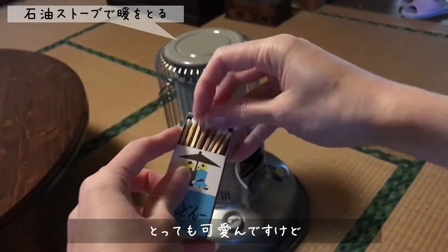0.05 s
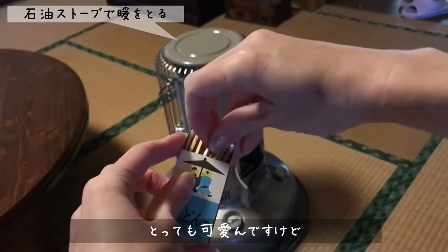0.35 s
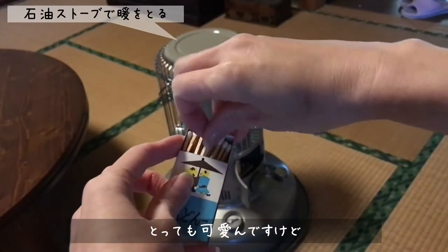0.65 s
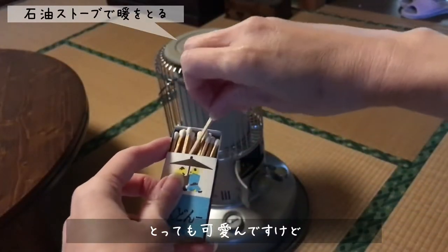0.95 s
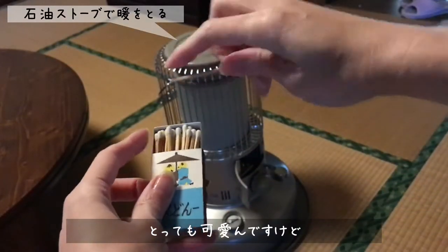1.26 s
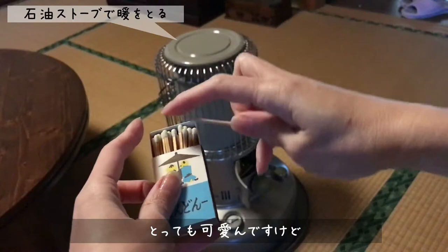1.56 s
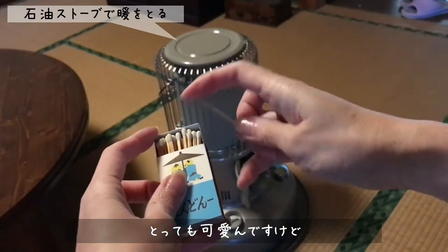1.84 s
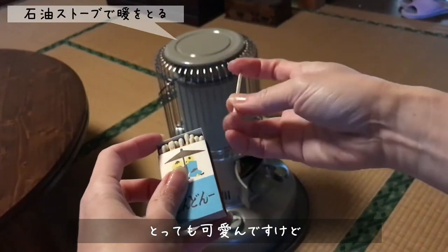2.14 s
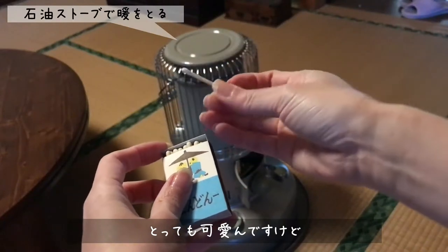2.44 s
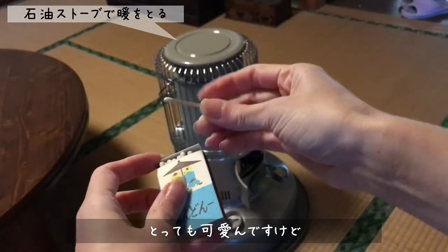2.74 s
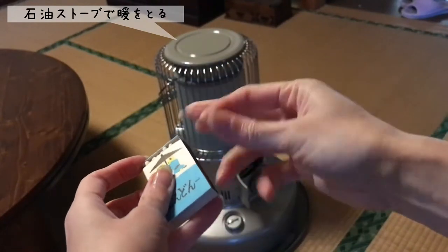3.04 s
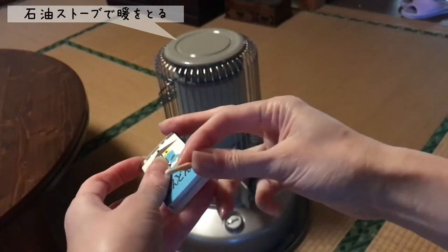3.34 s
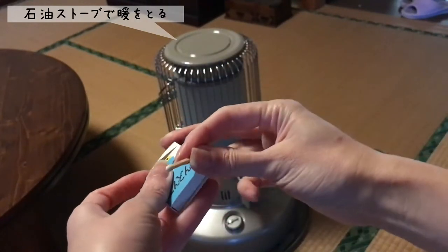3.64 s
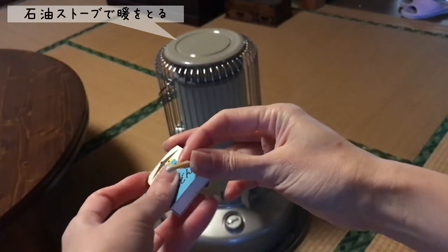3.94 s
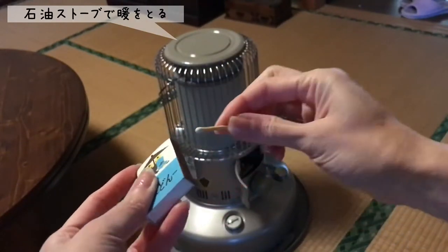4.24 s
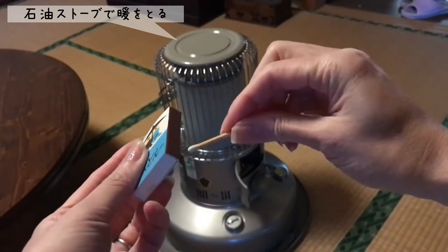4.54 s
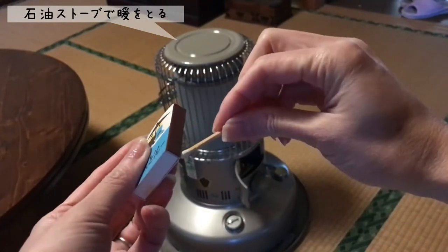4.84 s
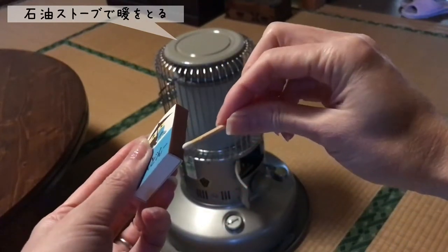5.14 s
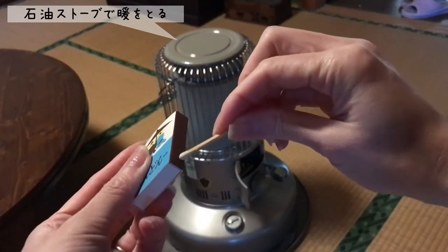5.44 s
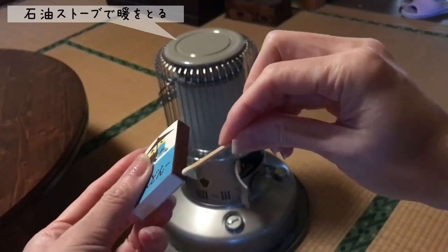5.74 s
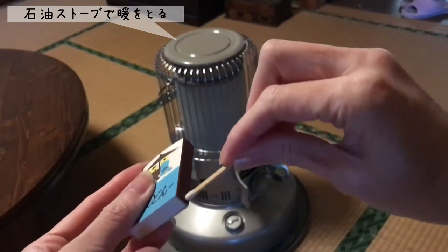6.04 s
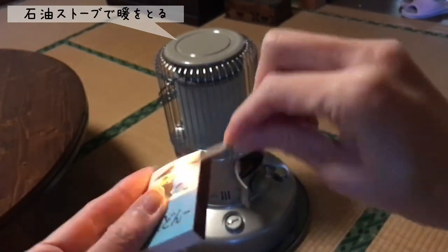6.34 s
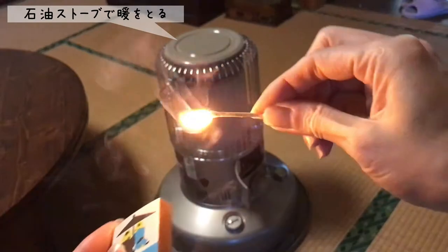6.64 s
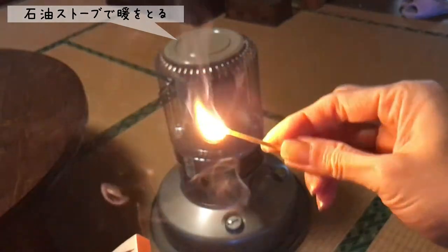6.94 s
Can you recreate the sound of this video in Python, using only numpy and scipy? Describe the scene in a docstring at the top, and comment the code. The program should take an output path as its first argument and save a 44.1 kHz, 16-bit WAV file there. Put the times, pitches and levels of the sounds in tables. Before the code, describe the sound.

Loose wooden sticks tick and slide in a small cardboard matchbox as one is picked out. Faint finger rubbing and scattered taps follow, then the papery slide of the tray closing and a few dull bumps. After a near pause, a quick rasp and a loud snap light the match, which hisses and settles into a fluttering flame. Everything is heard close up in a quiet, soft room with a faint low rumble.

```python
"""In a small, quiet room, close by, fingers pick a wooden match out of a cardboard box and strike it.
The sticks click and slide, one is drawn out and rolled between the fingertips, the tray is pushed shut
and the box is turned in the hand. Knocks ring the hollow box; rubbing is many tiny catches and slips.
Then the match head scrapes along the striker, catches with a crack, fizzes and flares."""
import sys
import numpy as np
from scipy import signal
from scipy.fft import rfft, irfft
from scipy.io import wavfile
from scipy.ndimage import uniform_filter1d

SR = 44100
rng = np.random.default_rng(int(sys.argv[2]) if len(sys.argv) > 2 else 0)


def digitize_waveform(pressure):
    """Quantize a signal to 16-bit integers and store it at the path in sys.argv[1].

    Rows of a 2-D input are taken as channels; values are limited to [-1, 1].
    """
    field = np.atleast_2d(pressure).T
    bounded = np.clip(field, -1, 1)
    quanta = np.round(bounded * 32767).astype(np.int16)
    wavfile.write(sys.argv[1], SR, quanta)


N = 312669
TIME = np.arange(N) / SR
MATCH_OUT_S, TRAY_SHUT_S, IGNITION_S = 1.3, 3.3, 6.3935
BOX_HZ, TOP_HZ = 2400, 16100  # the box's own pitch; where the treble is cut off


# the head bursting: (time [s], level [dB], bass lift [dB/octave], treble lift [dB/octave])
BURSTS = [(6.3907, 6.5, -2, 1), (6.3919, -9, 1, 0), (6.3924, -2.5, -8, 2.5), (6.3929, 1, 1, 1),
          (6.3932, 6, 5, -1)]
# the tone of a burst: (frequency [Hz], level [dB])
BURST_TONE = [(150, -32.5), (450, -18.5), (800, -11), (1400, -9), (2400, -2.5), (2950, -12.5), (3800, -1),
              (4400, 7), (5100, 4.5), (6200, -9.5), (7800, -9), (9200, 2.5), (10300, -9), (11500, 4),
              (15200, 0.5), (16500, 1)]

def ignition(puff_db=-4, sputter_db=-21, sputter_fade_s=0.016):
    """The match head bursts in a tight cluster of cracks, puffs out hot gas and sputters."""
    out = np.zeros(N)
    for s, db, bass, treble in BURSTS:
        add(out, s, undb(db) * response(BURST_TONE, bass, treble))
    puff = thump(start_hz=1300, end_hz=153, glide_s=.00222, fade_s=.0138)
    add(out, BURSTS[1][0], undb(puff_db) * puff)
    t = TIME[:SR // 2]
    sputter = undb(sputter_db) * fade(t, sputter_fade_s) * grit(len(t), per_s=7800, spread_db=6.5)
    add(out, BURSTS[0][0], through(sputter, response(BURST_TONE, bass=3.9, treble=-5.5)))
    return out


def thump(start_hz, end_hz, glide_s, fade_s):
    """A short thump that falls in pitch as it fades."""
    t = TIME[:SR // 30]
    hz = end_hz + (start_hz - end_hz) * np.exp(-(t / glide_s) ** 2)
    wave = np.sin(2 * np.pi * np.cumsum(hz) / SR) * fade(t, fade_s)
    return unit_energy(np.diff(wave, prepend=0) / hz)


def microphone_ring(lag_s=0.0024, level_db=-25):
    """A low thump, falling in pitch, rings on in the microphone after the crack."""
    out = np.zeros(N)
    ring = thump(start_hz=150, end_hz=48, glide_s=0.004, fade_s=0.086)
    add(out, IGNITION_S + lag_s, undb(level_db) * ring)
    return out


# the tone of the gas jet: (frequency [Hz], level [dB])
JET_TONE = [(100, -9), (300, -19), (1300, 5.5), (2500, 5), (4400, 1.5), (7000, 0), (7900, -3), (9600, 5),
            (10500, -3), (12200, 1), (16000, -3)]

def fizz(level_db=-33, fade_s=0.22):
    """A jet of gas hisses out of the head and dies away."""
    out = np.zeros(N)
    t = TIME[:SR // 2]
    jet = undb(level_db) * fade(t, fade_s) * grit(len(t), per_s=8200, spread_db=4)
    add(out, IGNITION_S, through(jet, response(JET_TONE)))
    return out


# how the flame rises and falls: (time [s], relative level [dB])
FLAME_LEVELS = [(6.52, -51.5), (6.544, -57.5), (6.596, -49.5), (6.61, -55), (6.704, -49), (6.73, -54),
                (6.752, -49.5), (6.936, -52.5), (6.962, -49), (7.048, -52), (7.09, -48)]
# the tone of the flame: (frequency [Hz], level [dB])
FLAME_TONE = [(60, -8), (220, 3.5), (430, -1.5), (1500, 1), (1950, -4.5), (2900, 0.5), (3450, -5.5),
              (4100, -2), (4700, -8.5), (5350, -3.5), (7900, -9.5), (9200, -8.5), (10500, -14),
              (12700, -10.5), (16000, -16)]

def flame(flutter_db=1.57, alight_at_s=6.64, changeover_s=0.014):
    """The flame rushes, dull at first, then seething brightly once the whole head is alight."""
    times, levels = np.transpose(FLAME_LEVELS)
    heat = undb(np.interp(TIME, times, levels) + flutter_db * wander(per_s=220)) * (TIME > IGNITION_S)
    alight = .5 + .5 * np.tanh((TIME - alight_at_s) / changeover_s)
    dull = response(FLAME_TONE, bass=0.91, treble=-1.9)
    bright = response(FLAME_TONE, rings=[(5300, .1, 3.5), (3470, .15, -4.5)])
    rush = undb(-1.3) * through(grit(N, per_s=9000, spread_db=1), dull)
    seethe = undb(-0.5) * through(grit(N, per_s=5000, spread_db=3), bright)
    return heat * (np.sqrt(1 - alight) * rush + np.sqrt(alight) * seethe)


# the head biting, dragging and leaving the striker: (start [s], rise [s], fall [s], level [dB],
# bass lift [dB/octave], treble lift [dB/octave], ring [Hz])
STRIKE = [(6.346, 0.0011, 0.018, -34, -3.5, -5.5, 1800), (6.358, 0.024, 0.008, -32, 1, 0.5, 3679),
          (6.425, 0.0042, 0.017, -35, -5, -1, 2150)]

def scrape():
    """The head rasps over the grains of the striker, which shake the box."""
    out = np.zeros(N)
    for rub in STRIKE:
        add(out, rub[0], slide(rub, per_s=16000, spread_db=3.5, rings=[(700, .79, -2.5)]))
    return out


# wood and card meeting: (time [s], relative level [dB], treble lift [dB/octave], ring [Hz])
TAPS = [(0.062, -31.5, 8, 6200), (0.133, -26, 1, 4200), (0.1375, -30, 0, 2400), (0.1773, -17.5, -0.5, 2300),
        (0.1966, -26.5, 2, 5300), (0.233, -32, 1, 2400), (0.265, -22, -4, 2730), (0.309, -36, 0, 6400),
        (0.3393, -33, 0, 3280), (0.343, -25.5, -11, 4020), (0.4293, -21.5, -0.5, 6900),
        (0.5655, -26.5, -3, 5370), (0.631, -16.5, 1, 2480), (0.756, -29, 2.5, 2800),
        (0.815, -26.5, 2, 5430), (0.8203, -31.5, -1, 2600), (0.941, -33.5, 0, 2800),
        (1.0104, -37, -2, 5300), (1.0552, -29, 3, 3300), (1.1263, -22.5, 6, 1990), (1.1414, -27, 8, 1670),
        (1.1898, -30, 6, 10700), (1.2227, -28, 6, 1700), (1.3313, -33.5, 8, 5200), (1.3398, -35, 6.5, 1680),
        (2.079, -32.5, 1, 13000), (2.377, -33, -1, 9200), (2.404, -19.5, -9, 1680),
        (2.5953, -29, -18, 1500), (2.7184, -22.5, 8, 9100), (2.7926, -42, 23, 11000),
        (2.9066, -42, 15, 13000), (3.7334, -24, 3.5, 12500), (3.8147, -35, -7, 1400),
        (4.0216, -27, 1, 1710), (5.4295, -30.5, -7, 1700), (5.5075, -35, -3.5, 9300),
        (5.6268, -28, 1.5, 1870), (5.7747, -43.5, 6, 6260), (6.349, -14.5, 9, 10700), (6.365, -17, 5, 2800)]

def clicks(gain_db=0.9, hard_above_db=-28):
    """Wood and card knock together: sharp taps add both bass and treble, hard ones have less bass."""
    out = np.zeros(N)
    for s, db, treble, ring_hz in TAPS:
        bass = 4 + 0.36 * treble - 0.6 * max(db - hard_above_db, 0)
        add(out, s, undb(db + gain_db) * click(s, treble, ring_hz, bass))
    return out


def click(s, treble, ring_hz, bass, chatter_db=-5, chatter_fade_s=0.022):
    """One tap rings the box, a stick and two of its neighbours, and chatters as it settles."""
    t = TIME[:SR // 30]
    chatter = fade(t, chatter_fade_s) * grit(len(t), per_s=2200, spread_db=6.5)
    force = (t == 0) + undb(chatter_db) * unit_energy(chatter)
    neighbours = [(hz, .06, 9.5) for hz in 4800 * 2 ** (0.68 * rng.standard_normal(2))]
    rings = [(ring_hz, .35, 7), (ring_hz, .07, 5), (14500, .3, -3), *neighbours]
    knock = signal.fftconvolve(force, box(s, bass, treble, rings))
    return smear(unit_energy(knock))


def smear(x, lag_s=0.000496):
    """Low notes travel more slowly through thin wood and card; lag_s is the delay at BOX_HZ."""
    size = len(x) + 1024
    f = np.fft.rfftfreq(size, 1 / SR)
    phase = 4 * np.pi * lag_s * np.sqrt(f * BOX_HZ)
    return irfft(rfft(x, size) * np.exp(-1j * phase), size)


# a stick, the tray or a finger rubbing along the box:
# (start [s], rise [s], fall [s], relative level [dB], treble lift [dB/octave], ring [Hz])
RUBS = [(0.121, 0.012, 0.025, -43.5, -1, 4170), (0.152, 0.014, 0.019, -43.5, -1, 1690),
        (0.192, 0.016, 0.04, -48.5, 1.5, 1670), (0.421, 0.012, 0.043, -48, -3, 1050),
        (0.605, 0.033, 0.017, -43.5, -0.5, 5440), (1.04, 0.013, 0.057, -62.5, 1, 4200),
        (1.112, 0.013, 0.031, -49.5, 0.5, 1710), (1.35, 0.11, 0.073, -64.5, 0, 11400),
        (2.323, 0.0054, 0.012, -52, 0.5, 4200), (2.363, 0.008, 0.012, -55.5, 1, 8900),
        (2.466, 0.008, 0.021, -53, 1.5, 1050), (2.585, 0.011, 0.12, -64.5, 2, 1400),
        (2.719, 0.0036, 0.061, -62, 5, 3320), (2.95, 0.054, 0.033, -70, 10, 13000),
        (3.144, 0.0058, 0.009, -48, 4, 7000), (3.158, 0.013, 0.024, -55, 4, 2350),
        (3.26, 0.1, 0.13, -70, 4, 4200), (3.468, 0.013, 0.013, -61.5, 3, 2400),
        (3.51, 0.012, 0.016, -53.5, 0.5, 3000), (3.668, 0.026, 0.0066, -41, -1, 4000),
        (3.692, 0.0067, 0.036, -48.5, 0.5, 2760), (3.724, 0.02, 0.062, -47.5, 0, 1480),
        (3.88, 0.061, 0.086, -56.5, -0.5, 9200), (4.02, 0.048, 0.03, -56, 1.5, 5200),
        (4.17, 0.097, 0.12, -74, 2, 1100), (4.31, 0.055, 0.048, -62.5, 3, 2000),
        (4.76, 0.026, 0.024, -69.5, -7, 1800), (4.91, 0.052, 0.0082, -55.5, -2.5, 1970),
        (4.965, 0.019, 0.019, -51, -3.5, 4200), (5.26, 0.01, 0.012, -63, -9, 1710),
        (5.337, 0.003, 0.028, -55, -4, 5400)]

def strokes(gain_db=-0.8):
    """Loose sticks catch roughly; once the match is out, card and skin slide more finely."""
    out = np.zeros(N)
    for s, rise, fall, db, treble, ring_hz in RUBS:
        bass = 0.59 * treble
        if s < MATCH_OUT_S:
            texture = dict(per_s=1000, spread_db=4.5, bed_db=-23, scatter=.684, contact_db=6.5)
        else:
            bass += 0.8
            texture = dict(per_s=6000, spread_db=4, scatter=.65, contact_db=5.5, rings=[(ring_hz, .2, 3)])
        add(out, s, slide((s, rise, fall, db + gain_db, bass, treble, ring_hz), **texture))
    return out


def slide(rub, per_s, spread_db, bed_db=-20, scatter=0, contact_db=0, rings=(), contacts=4):
    """Fibres catch and slip as pressure swells; the contacts' pitches stray by about scatter octaves."""
    s, rise, fall, db, bass, treble, ring_hz = rub
    t = np.arange(int((rise + fall) * SR)) / SR
    pressure = np.interp(t, [0, rise, rise + fall], [0, 1, 0]) ** 0.83
    out = 0
    for contact_hz in ring_hz * 2 ** (scatter * rng.standard_normal(contacts)):
        body = box(s, bass, treble, [(ring_hz, .3, 5), (contact_hz, .09, contact_db), *rings])
        slips = pressure * grit(len(t), per_s / contacts, spread_db, bed_db)
        out = out + signal.fftconvolve(slips, body)
    return undb(db) * out / np.sqrt(contacts)


# the tone of the box, open and shut: (frequency [Hz], level [dB])
OPEN_TONE = [(200, -25.5), (500, -25.5), (720, -8.5), (1050, -12), (2450, -0.5), (3350, -11), (4050, -3),
             (4750, -9), (5400, -3.5), (6100, -10), (6900, -8), (7900, -17), (9500, -13.5), (10600, -21),
             (12500, -18.5), (16000, -31.5)]
SHUT_TONE = [(200, -34), (500, -21.5), (800, -10), (1800, -1), (2300, -1.5), (3200, -10.5), (4300, -5.5),
             (7200, -8), (7900, -14), (9400, -12), (10500, -21.5), (12300, -12), (16000, -22)]

def box(s, bass, treble, rings):
    """The hollow box rings differently once its tray is pushed in."""
    return response(OPEN_TONE if s < TRAY_SHUT_S else SHUT_TONE, bass, treble, rings)


# fingertip pushes, each running into the next: (start [s], relative level [dB])
PUSHES = [(1.77, -54.5), (1.831, -57.5), (1.896, -60.5), (1.93, -59), (1.98, -56.5), (2.035, -56),
          (2.095, -54.5), (2.142, -55.5), (2.205, -56), (2.236, -51), (2.28, -54)]

def roll(end_s=2.305, overlap_s=0.0064, gain_db=-1.35, bass=-1.5, treble=0.9, ring_hz=2800):
    """The match turns between the fingertips in short pushes and adds its own ring."""
    out = np.zeros(N)
    ends = [s for s, _ in PUSHES[1:]] + [end_s]
    rings = [(1750, .17, -4), (1150, .41, 6), (13000, .12, 4.5)]
    for (s, db), end in zip(PUSHES, ends):
        length = end - s + overlap_s
        rub = (s, .23 * length, .77 * length, db + gain_db, bass, treble, ring_hz)
        add(out, s, slide(rub, per_s=4000, spread_db=3, scatter=.5, contact_db=8, rings=rings))
    return out


# changes of grip: (time [s], level [dB])
GRIPS = [(4.159, -31), (4.228, -37.5), (4.283, -34)]
# the low notes they wake: (pitch [Hz], relative level [dB], fade time [s])
GRIP_NOTES = [(265, 1, 0.085), (310, -1, .04), (390, -19, .025), (1050, -1, 0.053), (1180, -8, 0.014)]

def knocks(detune=0.028, vary_db=3):
    """Soft fingers bump the box and wake only a few low notes, differently each time."""
    out = np.zeros(N)
    t = TIME[:SR // 4]
    for s, db in GRIPS:
        ring = 0
        for hz, note_db, fade_s in GRIP_NOTES:
            hz *= 1 + detune * rng.standard_normal()
            note_db += vary_db * rng.standard_normal()
            ring = ring + undb(note_db) * fade(t, fade_s) * np.sin(2 * np.pi * hz * t)
        add(out, s, undb(db) * unit_energy(ring))
    return out


# fingers stirring the loose sticks: (start [s], length [s], relative level [dB])
STIRRING = [(0, 0.14, -58), (.24, .19, -54), (.495, 0.11, -63.5), (.7, .085, -56), (0.797, .1, -59.5)]

def rummage(slips=5, slip_s=.055, slip_db=-4, bass=2, treble=0, ring_hz=2600, ticks=3, tick_db=22):
    """Stirred sticks slip one after another, each at its own pitch, and tick against their neighbours."""
    out = np.zeros(N)
    texture = dict(per_s=700, spread_db=6, bed_db=-29, scatter=.74, contact_db=12)
    for start, length, db in STIRRING:
        for s in np.linspace(start, start + length - slip_s, slips):
            level_db = db + slip_db - 1.5 * rng.standard_normal()
            slip = (s, .36 * slip_s, .64 * slip_s, level_db, bass, treble, ring_hz)
            add(out, s, slide(slip, rings=[(2600, .5, -0.5), (6700, .28, 3.5)], **texture))
    for start, length, db in STIRRING:
        for k, (when, pitch) in enumerate(rng.random((ticks, 2))):
            s = start + length * (k + when) / ticks
            tick_hz = 4400 * 2 ** (0.58 * (2 * pitch - 1))
            add(out, s, undb(db + tick_db) * click(s, treble=-1.5, ring_hz=tick_hz, bass=3))
    return out


def draw(start_s=.845, rise_s=.037, fall_s=.093, level_db=-60, bass=2, treble=0, ring_hz=1050):
    """The chosen match is drawn over the edge of the tray, which answers hollowly."""
    out = np.zeros(N)
    pull = (start_s, rise_s, fall_s, level_db, bass, treble, ring_hz)
    add(out, start_s, slide(pull, per_s=2200, spread_db=1, rings=[(ring_hz, .42, 9)]))
    return out


def rustle(level_db=-64, settle_s=0.84, fade_db_per_s=40):
    """The heap of sticks crackles while the fingers are in it, then settles."""
    stirred = undb(level_db - fade_db_per_s * np.maximum(TIME - settle_s, 0))
    body = response(OPEN_TONE, bass=3, treble=1, rings=[(6800, .15, 3), (750, .25, 2)])
    return stirred * through(grit(N, per_s=900, spread_db=4, bed_db=-28), body)


# echoes off close surfaces: (delay [s], level [dB])
CLOSE_ECHOES = [(.0016, -37), (.0043, -34), (0.0108, -23.5)]

def nearby(x, dull_hz=6000):
    """Hands and the things around them throw back a few quick, dull echoes."""
    out = x.copy()
    dull = signal.sosfilt(signal.butter(1, dull_hz, fs=SR, output="sos"), x)
    for delay_s, db in CLOSE_ECHOES:
        add(out, delay_s, undb(db) * dull)
    return out


def room(x, echo_db, low_fade_s=0.4, high_fade_s=0.052, split_hz=4000, gap_s=0.0028):
    """A small, soft room adds a faint wash of echoes whose treble dies first."""
    t = TIME[:SR // 2]
    noise = rng.standard_normal(len(t))
    low = signal.sosfilt(signal.butter(2, split_hz, fs=SR, output="sos"), noise)
    high = signal.sosfilt(signal.butter(2, split_hz, "high", fs=SR, output="sos"), noise)
    tail = (low * fade(t, low_fade_s) + undb(-6) * high * fade(t, high_fade_s)) * (t > gap_s)
    return x + undb(echo_db) * through(x, unit_energy(tail))


# the tone of the quiet room: (frequency [Hz], relative level [dB])
BACKGROUND_TONE = [(13, -56), (22, -19), (40, -2.5), (103, -2.5), (140, -8), (249, -9), (319, -11.5),
                   (1100, -18.5), (1490, -18.5), (1620, -18.5), (2080, -21), (3920, -23.5), (4380, -25),
                   (11800, -29), (16000, -29)]

def background(level_db=-69):
    """A low, steady rumble lies under faint hiss."""
    noise = through(rng.standard_normal(N), response(BACKGROUND_TONE, size=16384))
    return undb(level_db) * unit_level(noise)


def response(tone, bass=0, treble=0, rings=(), size=2048):
    """How a thing answers one sharp tap; each ring is (pitch [Hz], width [octaves], boost [dB])."""
    f = np.fft.rfftfreq(size, 1 / SR) + 1
    hz, db = np.transpose(tone)
    octave = np.log2(f / BOX_HZ)
    db = np.interp(np.log(f), np.log(hz), db)
    db += bass * np.clip(-octave, 0, 1.5) + treble * np.maximum(octave, 0)
    for ring_hz, width, ring_db in rings:
        db += ring_db * np.exp(-(np.log2(f / ring_hz) / width) ** 2)
    gain = undb(db) / np.hypot(1, (hz[0] / f) ** 2) / np.hypot(1, (f / TOP_HZ) ** 20)
    after_tap = 2 * irfft(np.log(gain))[:size // 2]  # keep half, so nothing sounds before the tap
    return unit_energy(irfft(np.exp(rfft(after_tap, size))))


def grit(count, per_s, spread_db, bed_db=-20):
    """Tiny ticks at random moments, most weak and a few strong, over a bed of finer ones."""
    hit = rng.random(count) < per_s / SR
    size = undb(spread_db * np.minimum(rng.exponential(size=count), 4))
    return unit_level((hit + undb(bed_db)) * size * rng.choice([-1, 1], count))


def wander(per_s):
    """Glide between random values."""
    hold = int(SR / per_s)
    steps = np.repeat(rng.standard_normal(N // hold + 1), hold)
    return unit_level(uniform_filter1d(steps, hold)[:N])


def fade(t, fade_s):
    """Die away by 60 dB every fade_s."""
    return undb(-60 * t / fade_s)


def undb(db):
    """Turn decibels into a gain."""
    return 10 ** (np.asarray(db) / 20)


def unit_level(x):
    """Scale to an average power of 1."""
    return x / np.sqrt(np.mean(x ** 2))


def unit_energy(x):
    """Scale to a total energy of 1."""
    return x / np.linalg.norm(x)


def through(x, body):
    """Pass x through a response, keeping its length."""
    return signal.fftconvolve(x, body)[:len(x)]


def add(out, s, x):
    """Mix x into out from time s on."""
    i = max(0, int(round(s * SR)))
    out[i:i + len(x)] += x[:len(out) - i]


def scene():
    """The match and the handling of its box, heard from close by in the small room."""
    match = scrape() + ignition() + fizz() + microphone_ring() + flame()
    handling = clicks() + strokes() + roll() + rustle() + rummage() + draw() + knocks()
    in_room = room(handling, echo_db=-20.5) + room(match, echo_db=-24.5)
    return (nearby(in_room) + background())[None]


def record(dry):
    """The very highest treble is cut off."""
    top_cut = signal.firwin(161, TOP_HZ, window="blackman", fs=SR)
    return np.array([np.convolve(x, top_cut, "same") for x in dry])


dry = scene()
out = record(dry)
digitize_waveform(out)
```